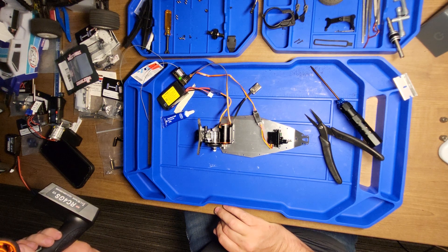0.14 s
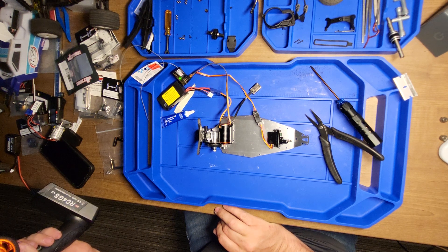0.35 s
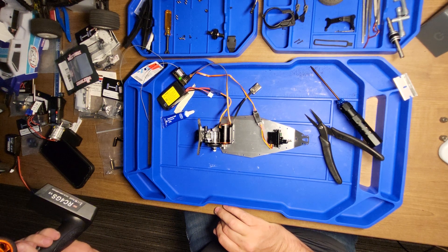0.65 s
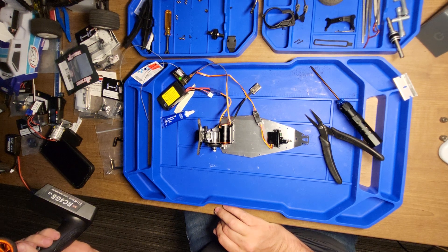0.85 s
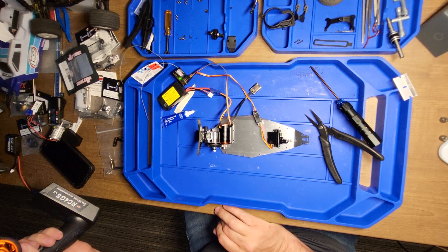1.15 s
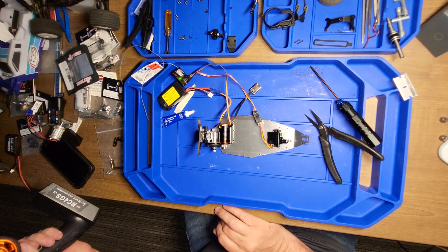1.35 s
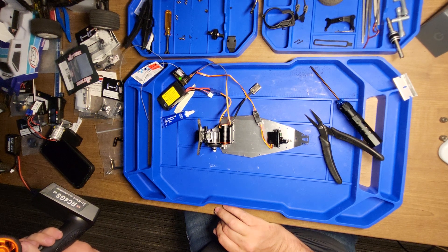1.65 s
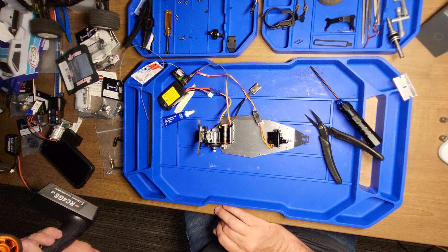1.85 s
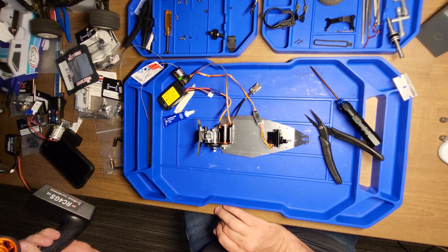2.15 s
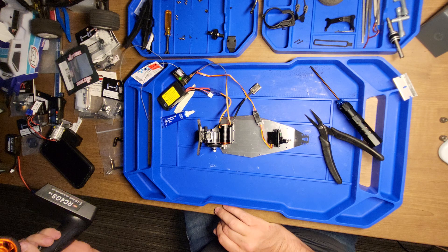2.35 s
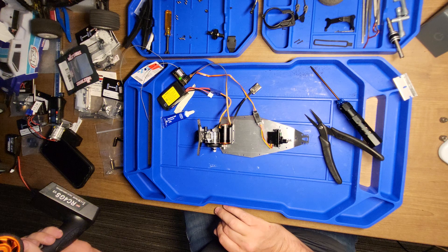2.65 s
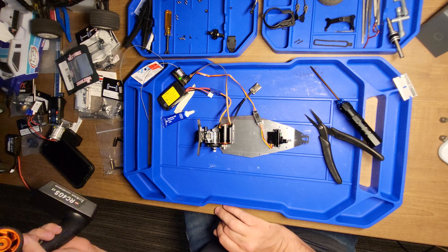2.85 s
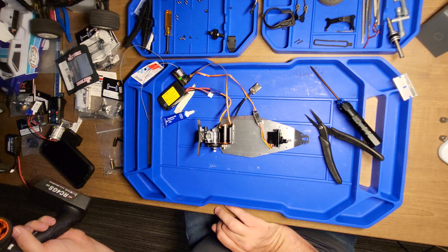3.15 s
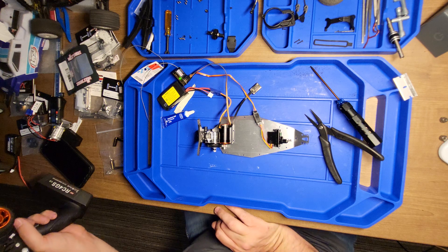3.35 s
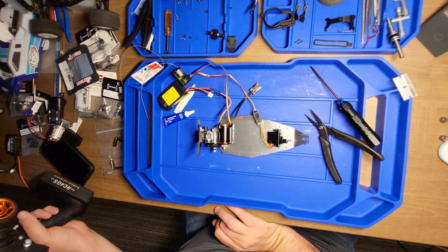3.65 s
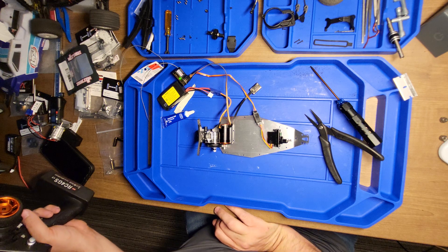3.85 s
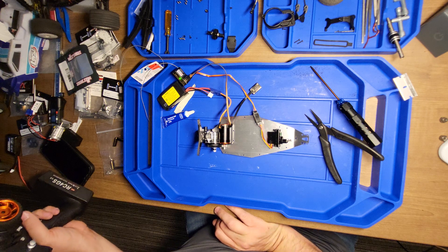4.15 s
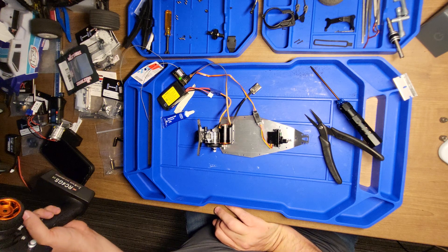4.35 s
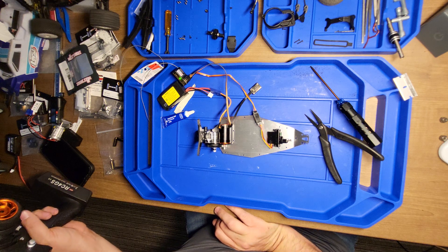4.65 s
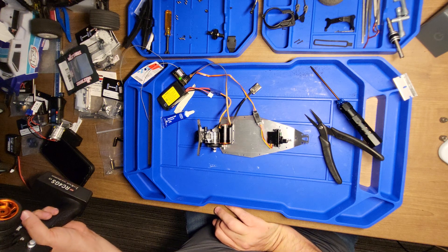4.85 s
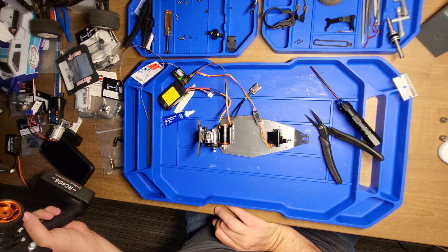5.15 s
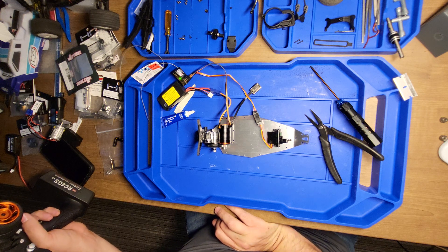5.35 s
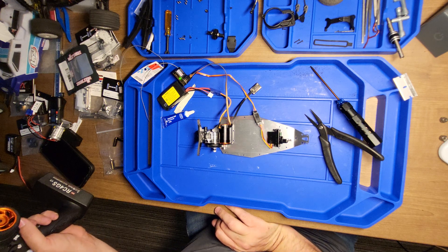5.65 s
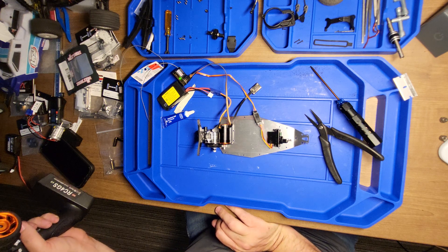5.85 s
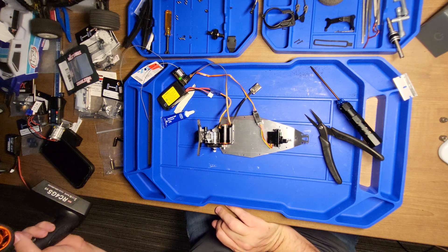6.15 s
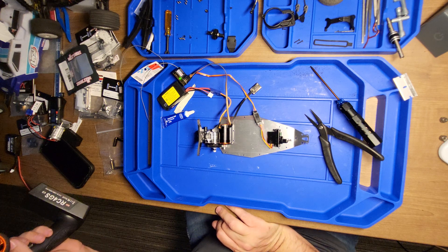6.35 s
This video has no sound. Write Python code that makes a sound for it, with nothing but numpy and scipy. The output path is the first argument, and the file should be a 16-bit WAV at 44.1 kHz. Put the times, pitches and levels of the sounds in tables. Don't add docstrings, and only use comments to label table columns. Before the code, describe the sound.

Close up on a workbench, a small electric motor drives an open gear train. It is already running down at first, stops briefly, then revs through several bursts with short nudges between them, and finally coasts to a rattling stop. Small metallic knocks mark starts and stalls. A low, wavering hum and faint hiss fill the small quiet room.

```python
import sys
import numpy as np
from scipy import signal
from scipy.fft import rfft, irfft, next_fast_len
from scipy.io import wavfile
from scipy.ndimage import uniform_filter1d

SR = 44100
rng = np.random.default_rng(int(sys.argv[2]) if len(sys.argv) > 2 else 0)


def to_wav(s):
    ch = np.atleast_2d(s).T
    pcm = np.round(np.clip(ch, -1, 1) * 32767)
    wavfile.write(sys.argv[1], SR, pcm.astype(np.int16))


def boost_factor(decibels):
    exponent = np.asarray(decibels, float) / 20
    return 10 ** exponent


N = 286209
SIZE = next_fast_len(N + SR)
HZ = np.fft.rfftfreq(SIZE, 1 / SR) + 1e-6
T = np.arange(N) / SR
FULL_MESH_HZ = 3232


def unit(x):
    return x / np.sqrt(np.mean(x ** 2))


def shape(points):
    hz, db = np.transpose(points)
    return boost_factor(np.interp(np.log(HZ), np.log(hz), db))


def modes(table):
    power = 0
    for hz, width, db in table:
        damping = (width * HZ) ** 2
        power = power + boost_factor(2 * db) * (damping / ((hz ** 2 - HZ ** 2) ** 2 + damping)) ** 2
    return power


def causal(power):
    cepstrum = irfft(.5 * np.log(power / power.mean() + 1e-12), SIZE)
    cepstrum[1:SIZE // 2] *= 2
    cepstrum[SIZE // 2 + 1:] = 0
    return np.exp(rfft(cepstrum))


def ring(x, response):
    return irfft(rfft(x, SIZE) * response, SIZE)[..., :N]


def walk(rate):
    k = int(SR / rate)
    held = np.repeat(rng.standard_normal(N // k + 1), k)
    return unit(uniform_filter1d(uniform_filter1d(held, k), k)[:N])


def bump(centre, width):
    return np.exp(-((T - centre) / width) ** 2)


# press in seconds, full speed in seconds, let go in seconds,
# tooth mesh at full speed in Hz, coasting time constant in seconds.
PULLS = [
    (-.4, -.1, 0.03, 1890, .33),
    (.59, .985, 1.09, 3232, .3),
    (1.755, 1.78, 1.79, 190, .3),
    (1.825, 2.22, 2.48, 3222, .33),
    (3.2, 3.3, 3.33, 260, .3),
    (3.748, 3.985, 3.985, 2460, .33),
    (4.115, 4.26, 4.25, 2720, .32),
    (4.548, 4.8, 5.07, 3245, .36),
]


def trigger():
    warm_hz_per_s, drag_hz, crawl_hz = 110, 260, 70
    hz, pull = np.zeros(N), np.zeros(N, int)
    for k, (press, full, off, top, coast) in enumerate(PULLS):
        on = T >= press
        start = hz[np.argmax(on)]
        powered = np.minimum(T, off)
        left = np.clip((full - powered) / (full - press), 0, 1)
        held = top - (top - start) * left ** 1.8 + warm_hz_per_s * np.clip(powered - full, 0, 1)
        slowing = np.exp(-np.maximum(T - off, 0) / coast)
        hz = np.where(on, np.maximum((held + drag_hz) * slowing - drag_hz, crawl_hz), hz)
        pull[on] = k
    return uniform_filter1d(hz, size=900, mode="nearest"), pull


# from in seconds, to in seconds.
STANDSTILL = [
    (0.544, .585),
    (3.345, 3.748),
    (5.92, 7),
]


def turning():
    stop_s = 0.011
    return 1 - sum(np.clip((T - a) / stop_s, 0, 1) * (T < b) for a, b in STANDSTILL)


# clatter in dB, extra clatter under load in dB,
# slope in dB per decade of speed, tone level in dB.
SEATING = [
    (8.5, 2.5, 34.5, -2.5),
    (0.1, 7.5, 30, 3),
    (1, 1.5, 26.5, -6),
    (0.1, 2, 30.5, 1),
    (0.1, -8.5, 29, -16),
    (4, 1, 30, -1.5),
    (4.5, -1, 35.5, -1),
    (0.1, 3, 30.5, -1),
]


def effort(hz, pull):
    smooth = uniform_filter1d(np.transpose(SEATING)[:, pull], size=1500, axis=1)
    clatter_db, load_db, slope_db, tone_db = smooth
    push = np.gradient(hz) * SR
    load_hz_per_s, load_lag_s = 8350, 0.0075
    keep = np.exp(-1 / (load_lag_s * SR))
    load = signal.lfilter([1 - keep], [1, -keep], np.tanh(np.maximum(push, 0) / load_hz_per_s))
    scrape_hz = hz + 507 * load
    frame_db = -18 + clatter_db + slope_db * np.log10(scrape_hz / FULL_MESH_HZ) + load_db * load
    slow = 1 / (1 + (hz / 350) ** 2)
    plate_db = frame_db - 10 + 14.5 * slow + 3.5 * walk(14)
    tray_db = frame_db - 31.5 + 18.5 * slow + 2.9 * walk(16)
    level = boost_factor(np.array([frame_db, plate_db, tray_db])) * turning()
    tone_db = tone_db - .9 * load_db * load + 9.5 * np.log10(hz / FULL_MESH_HZ)
    tone_db = tone_db + 6.5 * np.tanh(np.abs(push) / 5000) + 0.94 * walk(12)
    return uniform_filter1d(level, size=130, axis=1), uniform_filter1d(tone_db, size=900)


def contacts(mesh_hz, turns):
    tooth = np.exp(-(turns % 1) / 0.76)
    slack = 1 / (1 + (mesh_hz / 600) ** 2.6)
    chance = rng.random((2, N))
    ticks = (chance[0] < (70 + .06 * mesh_hz) / SR) * boost_factor(-1.5 * np.log(chance[1] + .02))
    rattle = signal.lfilter([1], [1, -np.exp(-1 / (0.0018 * SR))], ticks)
    force = tooth * boost_factor(0.25 * walk(40) + 2.6 * walk(2.0)) * (1 + (0.2 + 4.6 * slack) * rattle)
    even_force = force / np.sqrt(uniform_filter1d(force ** 2, size=6000))
    raw = even_force * rng.standard_normal((2, N))
    edge = signal.sosfilt(signal.butter(2, 7000, "high", fs=SR, output="sos"), raw)
    return raw + (boost_factor(-13 * slack) - 1) * edge


# start in seconds, peak in dB.
KNOCKS = [(0.463, -26.5), (0.5075, -32.5), (0.5869, -18.5), (1.6857, -44), (1.7325, -36), (1.7448, -40.5),
          (1.7689, -31), (1.8367, -22), (3.2124, -49), (3.2892, -29.5), (3.309, -35.5), (3.7484, -25),
          (3.7649, -17.5), (5.8391, -33.5), (5.8569, -29.5), (5.881, -36), (5.8964, -32.5), (5.955, -67)]


def knocks(table):
    out = np.zeros(N + 600)
    burst = rng.standard_normal((len(table), 600)) * np.exp(-np.arange(600) / SR / .003)
    for (s, db), b in zip(table, burst):
        start = int(s * SR)
        out[start:start + 600] += boost_factor(db - 1.5) * b
    return signal.sosfilt(signal.butter(2, 7000, "low", fs=SR, output="sos"), out[:N])


# centre in Hz, width in Hz, depth from 0 to 1.
NOTCHES = [(2150, 160, .9), (3470, 220, .9), (4740, 200, .8), (7900, 450, .85)]


def notched(power):
    return power * np.prod([1 - depth * np.exp(-((HZ - hz) / w) ** 2) for hz, w, depth in NOTCHES], axis=0)


# centre in Hz, width in Hz, level in dB.
FRAME = [(2680, 100, -23.5), (3186, 100, -20), (3590, 490, -4.5), (5440, 72, 5), (6403, 120, -9),
         (6857, 430, -6), (7177, 39, -4.5), (8230, 89, 0), (8750, 160, -4.5), (9700, 120, -3.5),
         (10170, 150, -1.5), (10200, 37, 1.5), (12290, 160, -1.5), (14260, 90, -1), (13410, 47, -8),
         (13800, 290, -10.5), (16100, 94, -17),
         (10030, 70, 3), (10120, 50, 1.5)]
# frequency in Hz, level in dB per Hz.
SKIN = [(1180, -65.5), (2000, -21), (2160, -19.5), (2610, -3), (3450, -23), (3750, -3), (4750, -6.5),
        (5380, 2), (7020, -13.5), (7850, 0.5), (9240, -10.5), (9810, -1), (10900, -2), (13100, -6.5),
        (15600, -17.5)]
# centre in Hz, width in Hz, level in dB.
PLATE = [(1508, 63, -4), (1596, 76, -1), (1686, 135, -2), (1683, 25, -12.5)]
TRAY = [(290, 42, -10.5), (392, 26, 4.5), (484, 87, -3), (626, 31, 8.5), (730, 290, 2.5), (897, 74, -3),
        (970, 150, -2), (1236, 540, -1.5), (1330, 350, -2.5)]


def chassis(level, mesh_hz, turns):
    hits, scrape = knocks(KNOCKS), contacts(mesh_hz, turns)
    small_parts = [(13070, 120, 2), (14400, 590, -4.5), (4330, 150, -8.0),
                   (12220, 80, -10), (12610, 80, -5.5), (14600, 150, -13)]
    frame_power = modes([*FRAME, *small_parts]) + boost_factor(-5.0) * shape(SKIN) ** 2
    frame = ring(level[0] * scrape + hits, causal(notched(frame_power)))
    plate = ring(level[1] * scrape + boost_factor(-5) * hits, causal(notched(modes(PLATE))))
    tray = ring(boost_factor(4.5) * level[2] * scrape + boost_factor(-22.5) * hits, causal(modes(TRAY)))
    return frame[0] + plate[0] + tray[0], frame[1] + boost_factor(-16.5) * plate[1] + tray[1]


# multiple of the mesh rate, level in dB.
TONES = [(1, -11), (2, -9.5), (3, -9.5), (4, -15)]
# multiple of the mesh rate, level in dB.
ROTOR = [(0.2294, -21.5), (0.462, -27)]
# centre in Hz, width in Hz, level in dB.
HOUSING = [(389, 71, -6), (657, 130, -1), (650, 40, -23), (1223, 150, 6.5), (1400, 230, -8.5),
           (2664, 340, 0.5), (3255, 280, -10.5), (4263, 270, 3.5), (5380, 570, -4), (6386, 280, -2.5),
           (9807, 250, 6.5), (10860, 300, 7), (11500, 880, -6), (12960, 1700, 1.5)]


def whine(level, tone_db, mesh_hz, turns):
    wobble_db, speed = 2.2, mesh_hz / 3200
    rotor = 0
    for k, db in ROTOR:
        rotor = rotor + boost_factor(db + wobble_db * walk(35)) * np.sin(2 * np.pi * k * turns + .4 * walk(40))
    rotor = rotor * speed ** 2.6
    mesh = 0
    for k, db in TONES:
        strike = speed ** (0.3 * (k - 1))
        mesh = mesh + boost_factor(db + wobble_db * walk(40)) * np.sin(2 * np.pi * k * turns) * strike
    mesh = signal.sosfilt(signal.butter(4, 2100, "high", fs=SR, output="sos"), mesh)
    mesh = mesh * boost_factor(tone_db) * level[0]
    housing = causal(modes(HOUSING) + boost_factor(-42.0) * (HZ / 8000) ** 2)
    thrum = boost_factor(-60.5 + 0.83 * walk(12)) * speed * np.sin(2 * np.pi * 0.08 * turns)
    return ring(boost_factor(-4.0) * mesh + boost_factor(-12.5) * rotor, housing) + thrum


def gears():
    hz, pull = trigger()
    mesh_hz = hz * (1 + .0008 * walk(60))
    turns = np.cumsum(mesh_hz) / SR
    level, tone_db = effort(hz, pull)
    first, second = chassis(level, mesh_hz, turns)
    return first + switching() + taps(), second, whine(level, tone_db, mesh_hz, turns)


# start in seconds, end in seconds, level in dB.
CHOPS = [
    (0.449, 0.484, -62),
    (0.584, 0.601, -36.5),
    (1.836, 1.865, -41),
    (3.75, 3.79, -36),
    (5.78, 5.828, -52.5),
]


def switching():
    gate = sum(boost_factor(db) * np.interp(T, [a - .004, a, b, b + .012], [0, 1, 1, 0]) for a, b, db in CHOPS)
    chop_hz, song = 4002, 0
    for k, db in [(1, -1.5), (2, -13), (3, 0.0)]:
        song = song + boost_factor(db + 4.0 * walk(90)) * np.sin(2 * np.pi * k * chop_hz * T)
    return gate * song


# start in seconds, peak in dB.
TAPS = [
    (6.2437, -46),
    (6.4844, -45),
]


def taps():
    rustle = 0
    for s, db in TAPS:
        fade = np.exp(-np.maximum(T - s, 0) / .07)
        rustle = rustle + boost_factor(db - 18.5) * np.clip((T - s) / .02, 0, 1) * fade
    rustle = rustle * boost_factor(3.5 * walk(60)) * rng.standard_normal(N)
    tap = ring(boost_factor(-0.5) * knocks(TAPS), np.sqrt(modes([(6000, 12000, 0)])))
    return tap + ring(rustle, np.sqrt(modes([(2967, 9100, -3.5), (400, 260, 16)])))


def decay(t60, length):
    t = np.arange(int(length * SR)) / SR
    tail = rng.standard_normal((2, len(t))) * boost_factor(-60 * t / t60)
    return tail / np.sqrt((tail ** 2).sum(axis=1, keepdims=True))


# centre in seconds, peak in dB.
SWELLS = [(.05, -39), (.4, -49), (.72, -45.5), (1.08, -47.5), (1.28, -45), (1.64, -49), (1.9, -47.5),
          (2.1, -56), (2.39, -47), (2.71, -49), (2.83, -56), (3.08, -50), (3.3, -47.5), (3.56, -55.5),
          (3.87, -45), (4.1, -42.5), (4.42, -45), (4.66, -46), (4.9, -48.5), (5.12, -62), (5.34, -41.5),
          (5.55, -46), (5.91, -48), (6.14, -49), (6.37, -46)]
# centre in seconds, change in dB.
MAINS_DIPS = [
    (.18, -4),
    (.95, -22.5),
    (1.25, -6.5),
    (2.45, -15.5),
    (2.95, -8),
    (3.6, -16.5),
    (4, -7),
    (5, -15),
]


def hum():
    swell = sum(boost_factor(db) * bump(s, 0.086) for s, db in SWELLS)
    double_hz = 117.0 + 1.1 * walk(4.0) + 4.9 * walk(25)
    double = np.sin(2 * np.pi * np.cumsum(double_hz) / SR) * swell * boost_factor(2.5 + 1.2 * walk(28))
    base_db = -59.5 + sum(db * bump(s, .09) for s, db in MAINS_DIPS) + 1.5 * walk(6) + 1.5 * walk(18)
    base = np.sin(2 * np.pi * np.cumsum(59.0 + 3.1 * walk(5)) / SR) * boost_factor(base_db)
    return (double + base) * boost_factor(np.array([[-.3], [.3]]))


# frequency in Hz, level in dB per Hz.
AIR = [(15, -59), (25, -36.5), (48, -19.5), (66, -26.5), (82, -31), (105, -9.5), (136, -8.5), (155, -19.5),
       (234, -24), (330, -26.5), (500, -37.5), (800, -49.5), (1200, -65.5), (16000, -79)]


def air(loud):
    mid, side = (unit(ring(rng.standard_normal(N), shape(AIR))) for _ in range(2))
    opening = uniform_filter1d(np.abs(loud), size=4000)
    recover_s = 0.47
    shut = sum((T > a) * (T < b) * np.exp(-np.maximum(T - a, 0) / recover_s) for a, b in STANDSTILL)
    db = -59.5 + 7 * np.sqrt(opening / opening.max()) - 7 * shut + 1.2 * walk(8)
    return boost_factor(db) * (mid + .4 * side * np.array([[1], [-1]]))


def hiss():
    port = np.sqrt(modes([(11500, 5000, 0.5), (5500, 3000, -10.0), (2800, 3000, -14.5)]))
    return boost_factor(-77.0 + 1.5 * walk(30)) * unit(ring(rng.standard_normal((2, N)), port))


# frequency in Hz, left minus right in dB.
LEFT_RIGHT = [(60, 6.5), (110, 2), (200, -19.5), (380, -3.5), (700, -0.5), (1290, -4.5), (2380, 2.5),
              (4400, -2.5), (8120, -1.5), (15000, 5.5)]
# frequency in Hz, lead of the left port in radians.
LEAD = [(0, 0.5), (2500, -1.9), (2840, 5), (3790, -5), (5770, -5), (6980, -1), (8100, -5.5), (9040, 0.5),
        (9470, 2), (11800, 4), (12900, 8.5), (13700, 5.5), (14100, 2), (15300, 15.5)]


def scene():
    first, second, tones = gears()
    ports = np.sqrt(shape(LEFT_RIGHT)) * np.exp(.5j * np.interp(HZ, *np.transpose(LEAD)))
    apart = boost_factor(-7) * second
    near = np.array([ring(first + apart, ports), ring(first - apart, 1 / ports)])
    near = near + tones * boost_factor(np.array([[.6], [-.6]]))
    room = signal.fftconvolve(near, decay(0.33, .7), axes=1)[:, :N]
    far = boost_factor(-5.5) * ring(room, 1 / (1 + 1j * HZ / 6000))
    return near + far + hum() + air(first) + hiss()


def band_limit(x):
    return signal.sosfilt(signal.butter(12, 15760, fs=SR, output="sos"), x)


def record(dry):
    mix = np.tanh(1.336 * dry) / 1.227
    return band_limit(mix)


dry = scene()
out = record(dry)
to_wav(out)
```